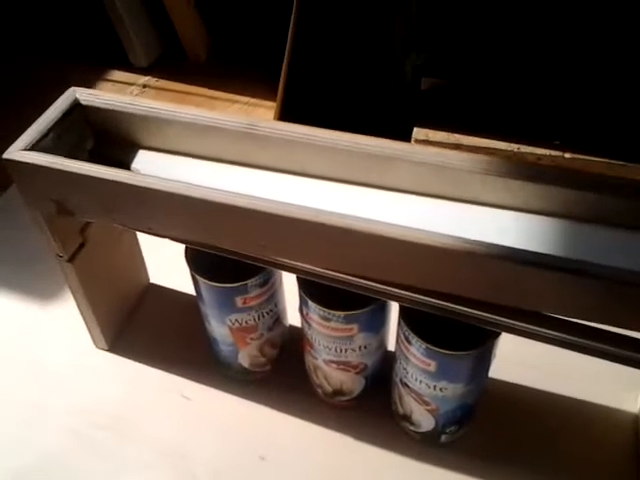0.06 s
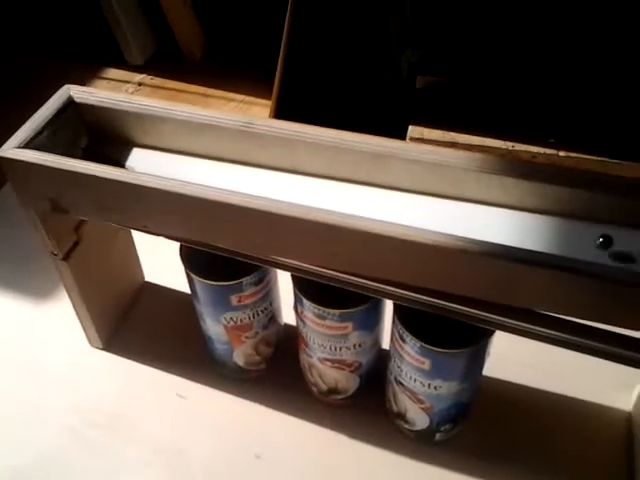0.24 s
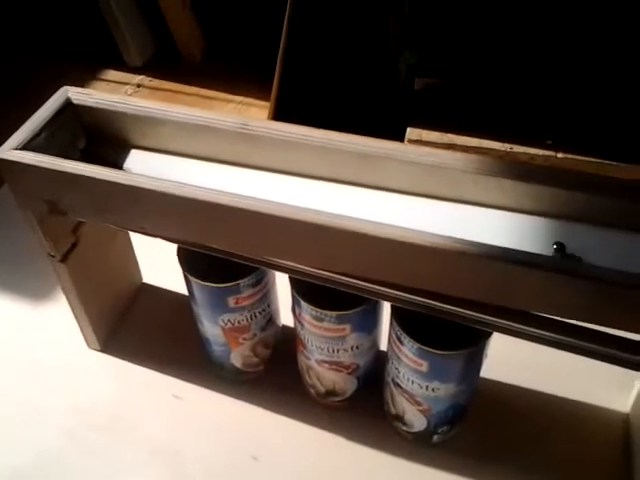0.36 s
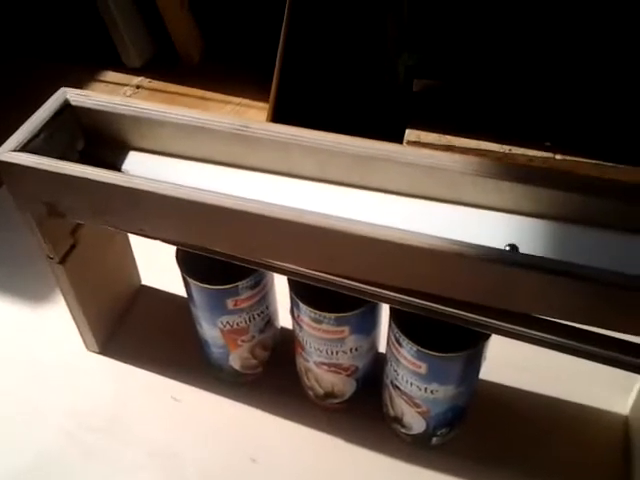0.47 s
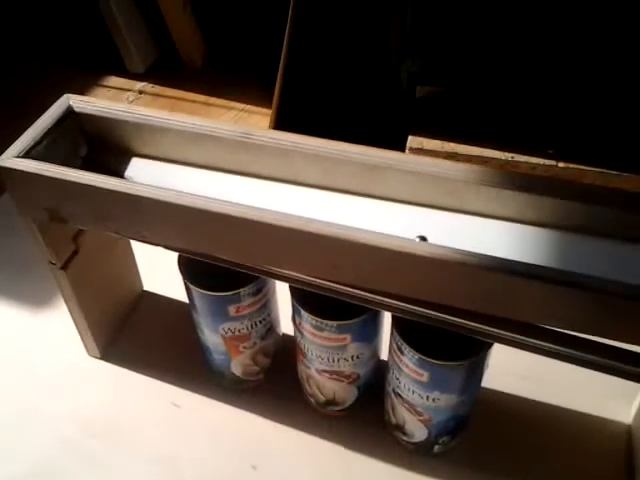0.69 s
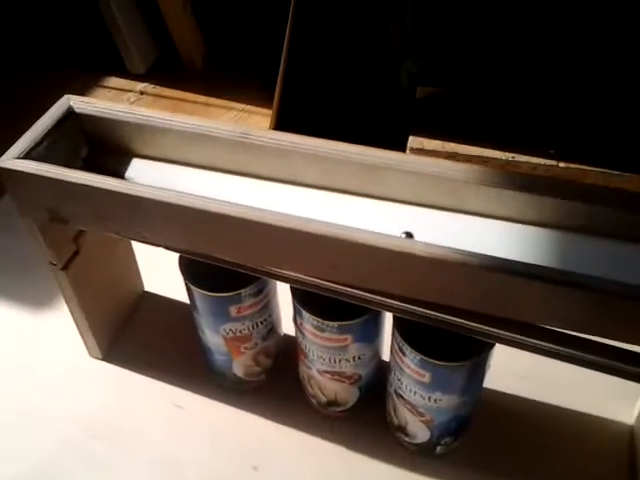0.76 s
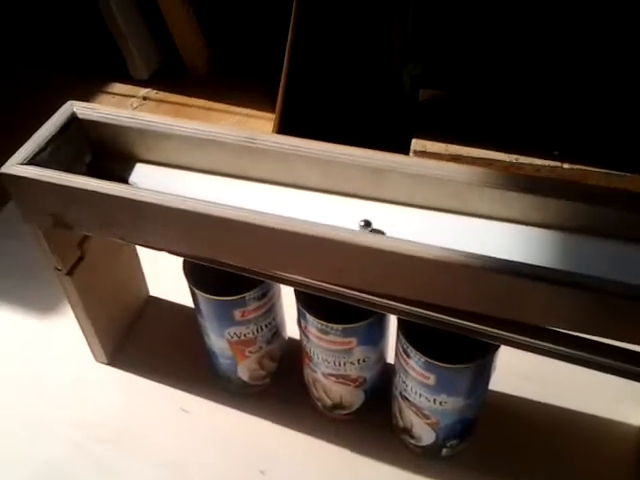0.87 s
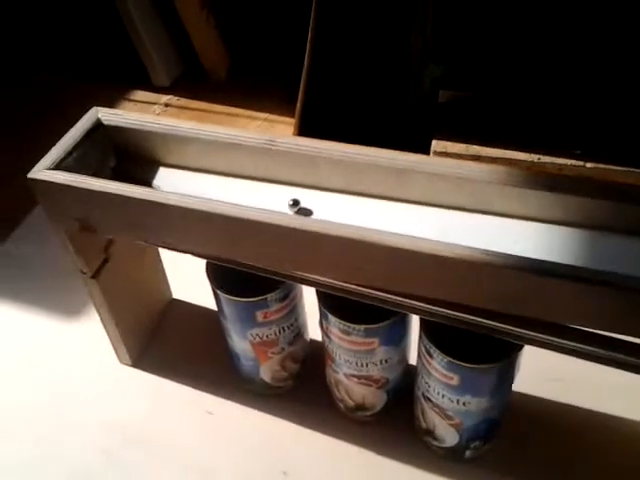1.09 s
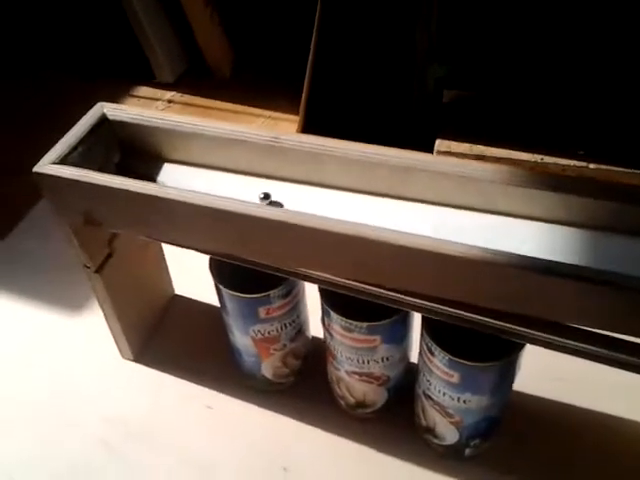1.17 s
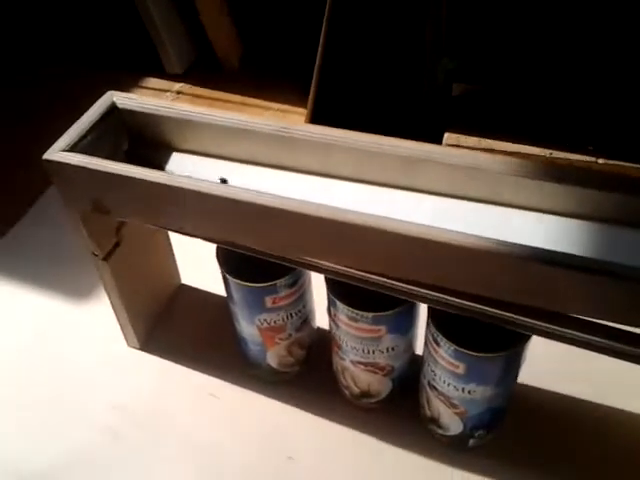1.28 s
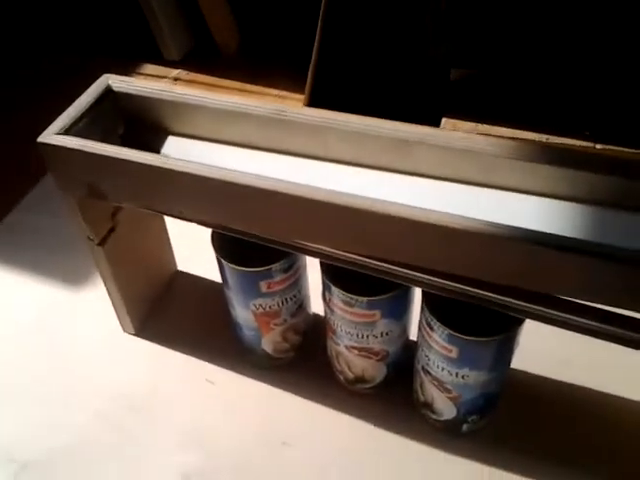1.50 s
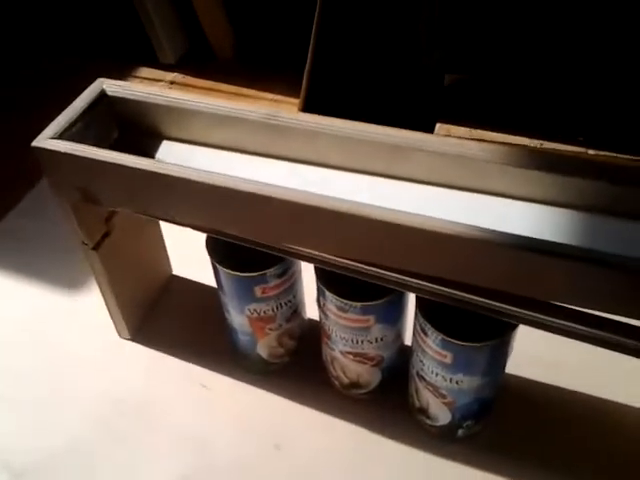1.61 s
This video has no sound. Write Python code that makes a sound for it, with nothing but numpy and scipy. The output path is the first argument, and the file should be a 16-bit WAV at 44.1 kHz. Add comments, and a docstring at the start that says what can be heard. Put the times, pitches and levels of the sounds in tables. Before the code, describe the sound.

Small steel balls drop into a wooden trough with hard, bright clacks and hollow knocks. The irregular clatter softens as they roll along the wood, close to a dull, slightly overloaded microphone in a small room.

```python
"""A faint scrape, then steel balls drop into a wooden trough on a table, clatter irregularly, softer
toward the end, and roll along it. Each blow gives a dry crack, a thud, a hollow knock and a hard bright
clack that ring on in the wood and a small room. Soft bumps sit underneath, and the rolling hums and
hisses over the grain. The microphone is close and dull, and the strong blows overload it."""
import sys
import numpy as np
from scipy import signal
from scipy.fft import rfft, irfft, next_fast_len
from scipy.io import wavfile

SR = 44100
rng = np.random.default_rng(int(sys.argv[2]) if len(sys.argv) > 2 else 0)


def materialize(psi):
    """Save the field psi as 16-bit PCM at rate SR to the path in sys.argv[1].

    A 1-D psi becomes a single channel; in a 2-D psi each row is a channel.
    """
    bounded = np.clip(np.atleast_2d(psi).T, -1, 1)
    quanta = np.round(bounded * 32767).astype(np.int16)
    wavfile.write(sys.argv[1], SR, quanta)


N = 72765
RIPPLE_DB, RIPPLE_HZ = 3.8, 35.1  # depth and spacing of the crowded resonances

# hits of the balls on the wood (time [s], thud level [dB], knock level [dB], clack level [dB])
BLOWS = [(.235, -2.5, 6.5, 3.5), (.243, -13.5, -8, 6), (.265, -10, 5.5, -2), (.291, -26, -8.5, -11),
         (.3932, -31, 4, -10.5), (.4185, -48, -11.5, -20), (.438, -45, -21, -25.5),
         (.4755, -27, 0.5, -17.5), (.490, -2.5, -3.5, 5.5), (.508, -11, -18.5, 3.5), (.529, -10.5, -2, -9),
         (.565, -22, -6, -16), (.589, -33, -7.5, -35.5), (.606, -42, -15, -34), (.7015, -7, -1, 3),
         (.7953, -25, -11.5, 2), (.803, -15.5, -12, 1), (.814, -20, -18, 0), (.835, -22.5, -22, -2.5),
         (.860, -14.5, -6, 0.5), (.876, -28.5, -16.5, -7.5), (.894, -25, -22, -14.5),
         (.912, -22, -24, -13.5), (.930, -20.5, -16, -3), (.965, -23.5, -20.5, -7.5),
         (.9945, -16.5, -7.5, -7.5), (1.018, -30, -30, -13), (1.047, -26.5, -15.5, -6.5),
         (1.057, -35.5, -27.5, -7.5), (1.077, -20, -15, -5), (1.096, -25, -26, -8),
         (1.1314, -30, -25.5, -5.5), (1.145, -23.5, -16.5, -14.5), (1.152, -35, -35.5, -8),
         (1.203, -27.5, -19, -5.5), (1.2434, -28, -23.5, -29.5), (1.2465, -50.5, -40, -7.5),
         (1.275, -30, -27, -15), (1.305, -32, -27, -13.5), (1.330, -33.5, -30, -15.5),
         (1.367, -39.5, -33, -40)]

def bounces():
    """Every blow cracks, and sounds the thud, knock and clack of the trough in its own proportions."""
    times, thud_db, knock_db, clack_db = np.array(BLOWS).T
    starts = (times * SR).astype(int)
    crack = contact_crack(starts, (knock_db + clack_db) / 2)
    body = thud(starts, thud_db) + knock(starts, knock_db) + clack(starts, clack_db)
    return crack + body + trough_ring(starts, thud_db, knock_db, clack_db)


# colour of the trough's crowded low modes (frequency [Hz], level [dB])
THUD_COLOUR = [(30, -26), (120, -24), (280, -17.5), (400, -1), (500, 1.5), (580, -3), (780, -7.5),
               (1100, -34)]

def thud(starts, levels_db):
    """The weight of the hit: low modes of the wood swell and die fast."""
    return dense_ring(starts, levels_db, THUD_COLOUR, strike_db=2.5, attack_s=0.0084, t60_s=0.0263,
                      room_db=-12, room_t60_s=0.2813)


# colour of the trough's crowded middle modes (frequency [Hz], level [dB])
KNOCK_COLOUR = [(500, -39), (830, -16.5), (960, -4), (1035, 4.5), (1120, -4), (1230, -8.5), (1400, -6),
                (1560, -1.5), (1720, -7.5), (1900, -8.5), (2150, -16), (3500, -19.5), (6500, -26.5),
                (8000, -55.5)]

def knock(starts, levels_db):
    """The hollow body of the hit: middle modes of the wood hold a little longer."""
    return dense_ring(starts, levels_db, KNOCK_COLOUR, strike_db=7, attack_s=0.0072, t60_s=0.0456,
                      room_db=-13.5, room_t60_s=0.3291)


# colour of the crowded high modes (frequency [Hz], level [dB])
CLACK_COLOUR = [(700, -38), (2000, -24.5), (2550, -13), (2800, -17.5), (3200, -14.5), (3550, -21),
                (4050, -15), (4400, -20), (5050, -10.5), (5300, -14), (5700, -5), (6090, 2), (6350, -4),
                (6580, -4.5), (6850, -16), (7500, -26), (8300, -40.5), (10000, -79)]

def clack(starts, levels_db, lag_s=0.0012):
    """The hard, bright edge of the hit: high modes snap in just after the knock starts."""
    return dense_ring(starts + int(lag_s * SR), levels_db, CLACK_COLOUR, strike_db=-5, attack_s=0.001,
                      t60_s=0.033, room_db=-10.5, room_t60_s=0.3063)


def dense_ring(starts, levels_db, colour, strike_db, attack_s, t60_s, room_db, room_t60_s):
    """A clean first strike, then crowded modes that flare and die fast, leaving a tail in the room."""
    t, taps = np.arange(N) / SR, np.zeros(N)
    taps[starts] = undb(levels_db + strike_db)
    strikes = signal.fftconvolve(taps, ping(colour))[:N]
    direct = np.minimum(t / attack_s, 1) ** 2 * fade(np.maximum(t - attack_s, 0), t60_s)
    room_build = 1 - np.exp(-t / 0.0027)
    room = undb(room_db) * room_build * fade(t, room_t60_s)
    return strikes + flares(starts, levels_db, direct ** 2 + room ** 2) * noise(colour, RIPPLE_DB)


# ringing notes of the trough (frequency [Hz], level [dB], t60 [s])
TROUGH_MODES = [(437, -16.5, .2), (466.02, -14, 0.283), (509.04, -7, 0.3104), (937.1, -17, 0.17),
                (1021.4, -10.5, 0.186), (1045.7, -8.5, 0.094), (1201, -24.5, 0.23), (1373.4, -24.5, 0.218),
                (1448, -21.5, 0.23), (1511.6, -12, 0.2346), (1611.8, -15.5, 0.297), (1870.6, -20, 0.295),
                (2524, -19, 0.225), (2890, -23.5, .25), (3227, -22, 0.311), (3897, -28, 0.35),
                (4478, -31, .3), (5036, -20.5, .27), (5077, -20, 0.286), (5732, -18.5, 0.316),
                (5995, -14, 0.204), (6069, -13, 0.229), (6538, -19.5, 0.17)]

def trough_ring(starts, thud_db, knock_db, clack_db, trim_db=-2.5, scatter_db=2, detune=0.001982):
    """The clear modes of the trough, weighted and slightly detuned anew at each point of contact."""
    hz, mode_db, t60 = np.array(TROUGH_MODES).T
    t, ring = np.arange(SR // 2) / SR, np.zeros(N + SR)
    decays = fade(t, t60[:, None])
    for start, low_db, mid_db, high_db in zip(starts, thud_db, knock_db, clack_db):
        level_jitter, pitch_jitter = rng.standard_normal((2, len(hz)))
        force_db = np.interp(hz, [600, 900, 2000, 3500], [low_db, mid_db, mid_db, high_db])
        gains = undb(trim_db + mode_db + force_db + scatter_db * level_jitter)
        cycles = np.outer(hz * (1 + detune * pitch_jitter), t)
        ring[start:start + len(t)] += gains @ (decays * np.sin(2 * np.pi * cycles))
    return ring[:N]


# broad colour of steel meeting wood (frequency [Hz], level [dB])
CRACK_COLOUR = [(150, -18.5), (400, -3), (1500, 0.5), (2600, 0), (4200, -3.5), (6000, -2), (7200, -15.5),
                (8500, -45.5), (12000, -70)]

def contact_crack(starts, levels_db, trim_db=-2):
    """The contact itself: a dry burst of noise with an instant attack."""
    decay = fade(np.arange(N) / SR, t60_s=0.029)
    return flares(starts, levels_db + trim_db, decay ** 2) * noise(CRACK_COLOUR)


# fader moves of the roll (time [s], hum level [dB], hiss level [dB])
ROLL_LEVELS = [(.5, -70.5, -71), (.58, -44, -55), (.65, -28, -46.5), (.9, -28.5, -31), (1.3, -28, -33),
               (1.371, -28, -48), (1.425, -23.5, -27), (1.47, -27, -39.5), (1.52, -27, -46),
               (1.535, -28, -31.5), (1.58, -25, -34.5), (1.62, -28.5, -31), (1.65, -36, -40)]
# colour of the trough's hum (frequency [Hz], level [dB])
HUM_COLOUR = [(30, -22), (120, -28), (300, -32.5), (480, -22.5), (800, -24.5), (930, -14.5), (1035, 3.5),
              (1130, -10.5), (1330, -16), (1520, -2), (1650, -15), (1830, -7), (2150, -21.5), (3500, -31.5),
              (8000, -71.5)]
# colour of the grain's hiss (frequency [Hz], level [dB])
HISS_COLOUR = [(900, -24.5), (2000, -10), (2600, 2), (2950, -6), (3240, 2), (3500, -8.5), (4300, -6.5),
               (5200, -8), (6100, 0), (6800, -12), (8000, -38), (11000, -59.5)]

def rolling(throb_db=2, throb_hz=55.086):
    """A ball rolls over the grain: the trough hums unevenly under a gritty hiss."""
    times, hum_db, hiss_db = np.array(ROLL_LEVELS).T
    t = np.arange(N) / SR
    throb = undb(throb_db * walk(throb_hz))
    hum = undb(np.interp(t, times, hum_db)) * noise(HUM_COLOUR)
    hiss = undb(np.interp(t, times, hiss_db)) * noise(HISS_COLOUR, RIPPLE_DB)
    return throb * (hum + hiss)


# cues of the low bumps (time [s], level [dB])
BUMP_CUES = [(.255, -17), (.50, -22), (.703, -27), (.80, -21.5), (1.457, -40)]
# their bass-heavy colour (frequency [Hz], level [dB])
BUMP_COLOUR = [(25, -4), (70, 1), (150, -2.5), (230, -8.5), (400, -35), (1000, -70)]

def bumps(attack_s=0.00674):
    """A few soft, deep bumps under the clatter."""
    times, levels_db = np.array(BUMP_CUES).T
    t = np.arange(N) / SR
    swell = np.minimum(t / attack_s, 1) * fade(t, t60_s=0.121)
    return flares((times * SR).astype(int), levels_db, swell ** 2) * noise(BUMP_COLOUR)


# fader moves of the opening scrape (time [s], level [dB])
SCRAPE_LEVELS = [(0, -42), (.045, -35), (.1, -44.5), (.14, -45.5), (.21, -61), (.3, -73)]
# its raspy colour (frequency [Hz], level [dB])
SCRAPE_COLOUR = [(150, -22.5), (380, -7), (600, -13.5), (1200, 3), (1700, -11), (2300, -11), (3200, -10),
                 (4500, -3.5), (6400, -12.5), (7500, -33), (9000, -58)]

def scrape():
    """A faint scrape dies away before the drop."""
    times, levels_db = np.array(SCRAPE_LEVELS).T
    return undb(np.interp(np.arange(N) / SR, times, levels_db)) * noise(SCRAPE_COLOUR, RIPPLE_DB)


# colour of the quiet room (frequency [Hz], level [dB])
ROOM_COLOUR = [(25, -0.5), (100, 0), (250, -15.5), (380, -9.5), (600, -13.5), (2000, -27), (8000, -55.5)]

def room_tone(level_db=-54):
    """The quiet of the room: a steady, dark bed of noise."""
    return undb(level_db) * noise(ROOM_COLOUR)


def undb(db):
    """Decibels to gain."""
    return 10 ** (np.asarray(db) / 20)


def fade(t, t60_s):
    """Exponential decay that loses 60 dB in t60_s."""
    return np.exp(-np.log(1000) * t / t60_s)


def walk(rate_hz):
    """Smooth random wander with a spread of 1."""
    wander = np.interp(np.arange(N) / SR * rate_hz, np.arange(512), rng.standard_normal(512))
    return wander / wander.std()


def flares(starts, levels_db, power_shape):
    """Envelope of overlapping blows, whose powers add."""
    power = np.zeros(N)
    for start, db in zip(starts, levels_db):
        power[start:] += undb(db) ** 2 * power_shape[:N - start]
    return np.sqrt(power)


def colour_gain(colour, f):
    """Gain of a colour at frequencies f, its points joined on a log frequency axis."""
    hz, db = np.array(colour).T
    return undb(np.interp(np.log(f), np.log(hz), db))


def noise(colour, ripple_db=0):
    """Coloured noise of rms 1, optionally rippled by closely spaced resonances."""
    size = next_fast_len(N)
    f = np.maximum(np.fft.rfftfreq(size, 1 / SR), 1)
    peaks = np.interp(f / RIPPLE_HZ, np.arange(2048), rng.standard_normal(2048))
    ripple = undb(ripple_db * peaks * f / (f + 1000))  # shallower in the bass
    white = rfft(rng.standard_normal(size))
    coloured = irfft(white * colour_gain(colour, f) * ripple, size)[:N]
    return coloured / coloured.std()


def ping(colour, size=4096):
    """Causal response of a body with this colour to one tap; peak 1."""
    f = np.maximum(np.fft.rfftfreq(size, 1 / SR), 1)
    cepstrum = irfft(np.log(colour_gain(colour, f)))[:size // 2]
    response = irfft(np.exp(2 * rfft(cepstrum, size)))[:size // 2]  # minimum phase
    return response / np.abs(response).max()


def scene():
    """Bouncing and rolling in a quiet room, heard in mono."""
    return (bounces() + bumps() + rolling() + scrape() + room_tone())[None]


# EQ after the overloaded input (frequency [Hz], gain [dB])
OUTPUT_EQ = [(30, -1.5), (300, -2), (1000, -0.5), (6500, 0), (8500, -5), (12000, -8.5), (16000, -7)]

def record(dry, mic_top_hz=8066, offset=0.0307, clip_level=0.6545, top_hz=16100):
    """A dull microphone overloads its input, which sits off zero, cuts the peaks and loses the top."""
    dull = signal.sosfilt(signal.butter(8, mic_top_hz, fs=SR, output="sos"), dry)
    oversampled = signal.resample_poly(dull + offset, 4, 1, axis=-1)
    clipped = signal.resample_poly(np.clip(oversampled, -clip_level, clip_level), 1, 4, axis=-1)
    f = np.fft.rfftfreq(N, 1 / SR)
    hz, db = np.array(OUTPUT_EQ).T
    low_pass = 1 / (1 + (f / top_hz) ** 160)
    return irfft(rfft(clipped) * undb(np.interp(f, hz, db)) * low_pass, N)


dry = scene()
out = record(dry)
materialize(out)
```